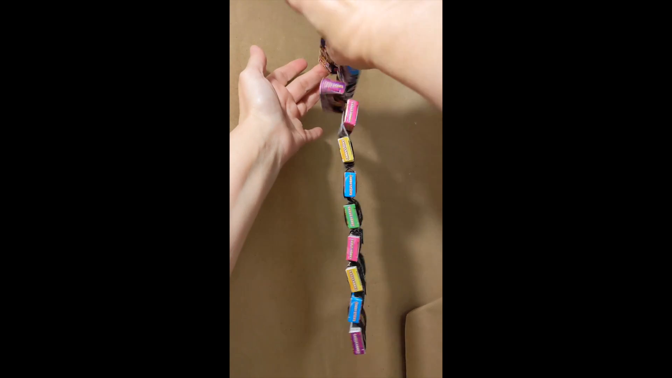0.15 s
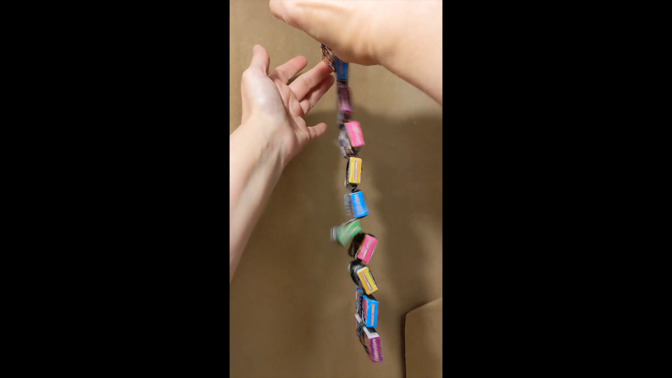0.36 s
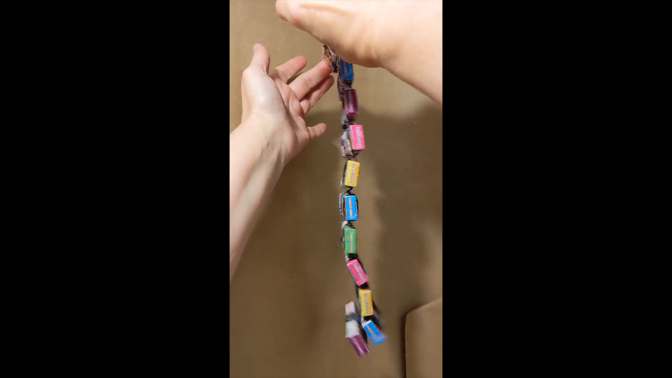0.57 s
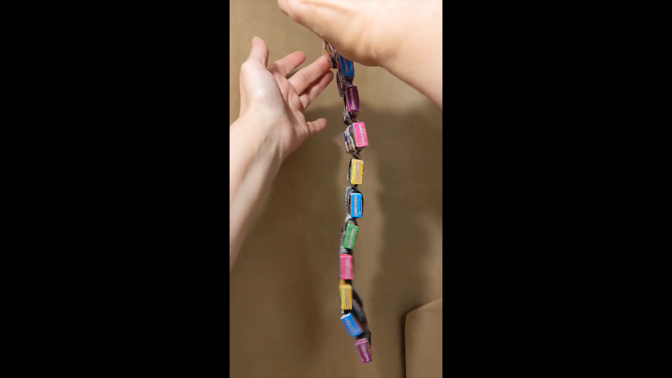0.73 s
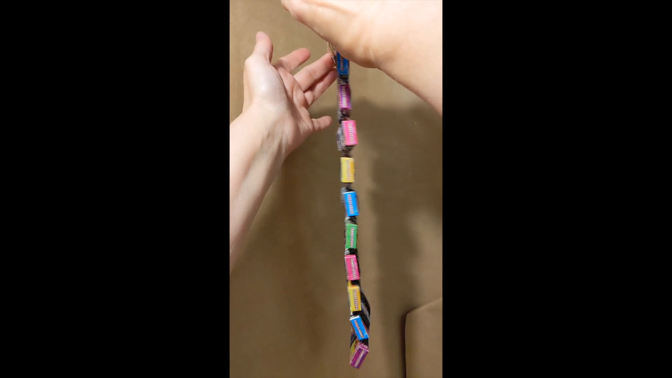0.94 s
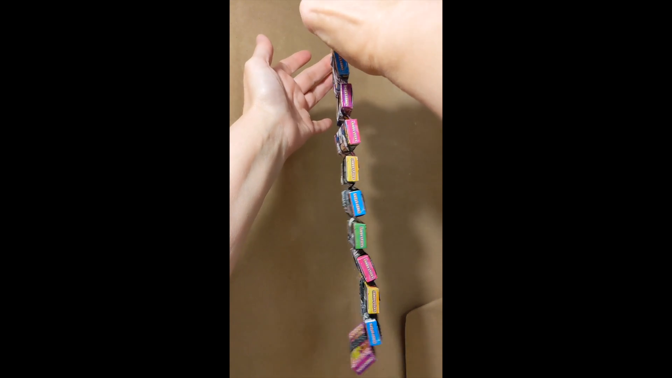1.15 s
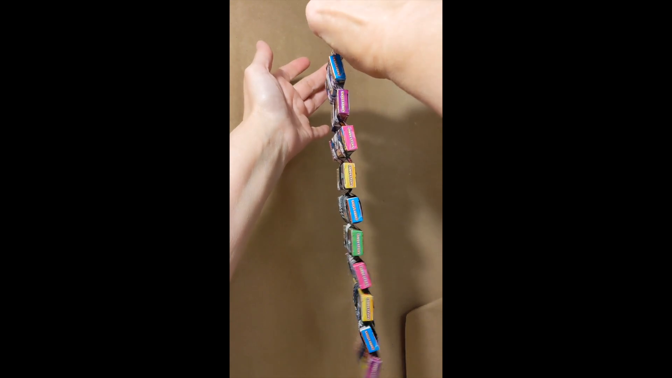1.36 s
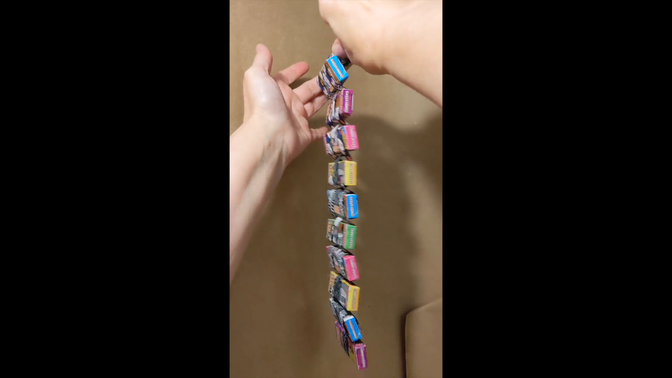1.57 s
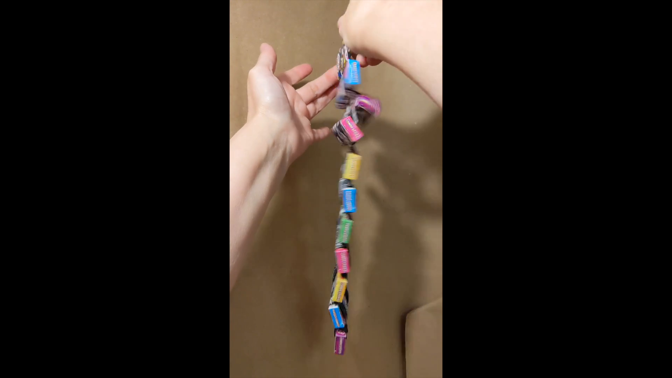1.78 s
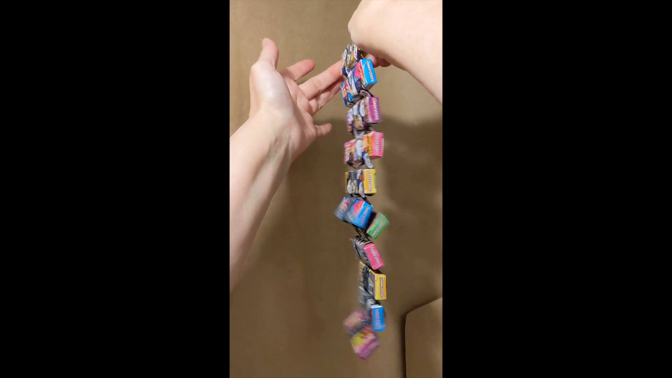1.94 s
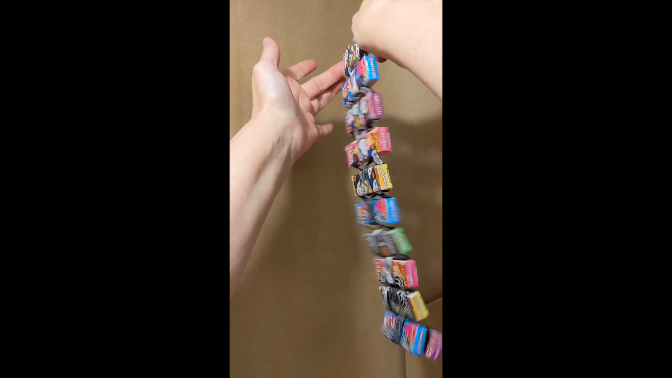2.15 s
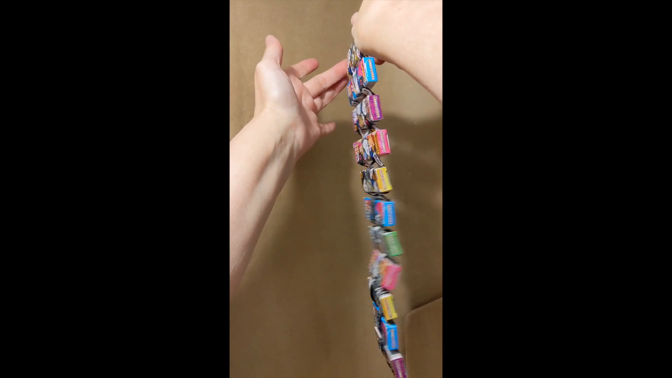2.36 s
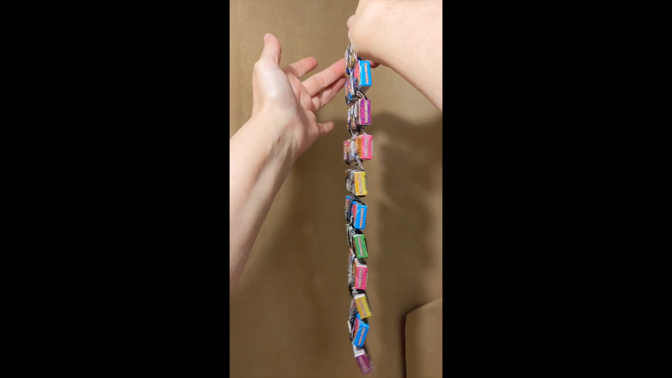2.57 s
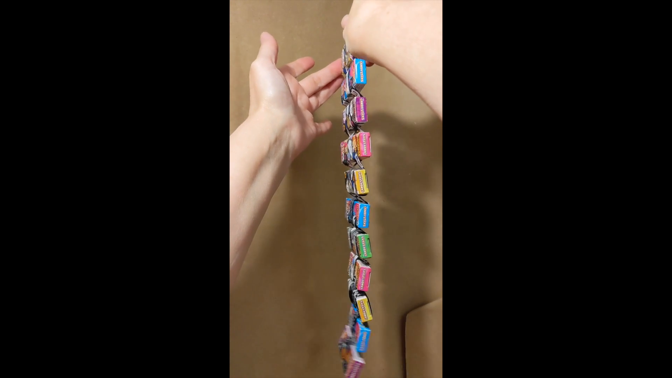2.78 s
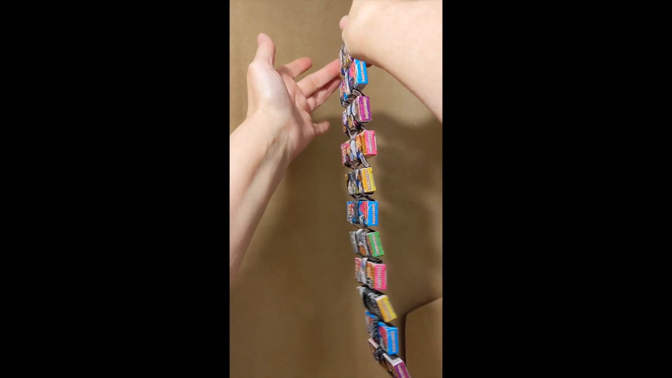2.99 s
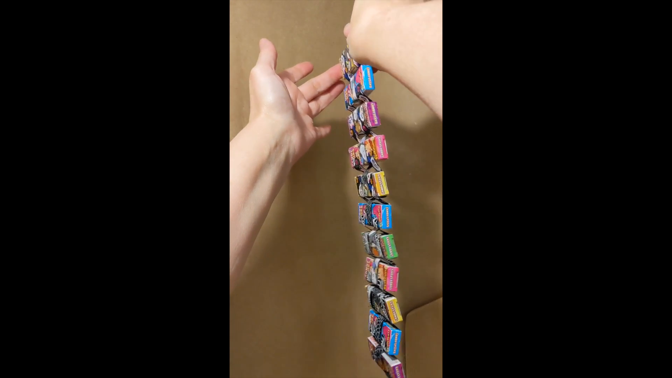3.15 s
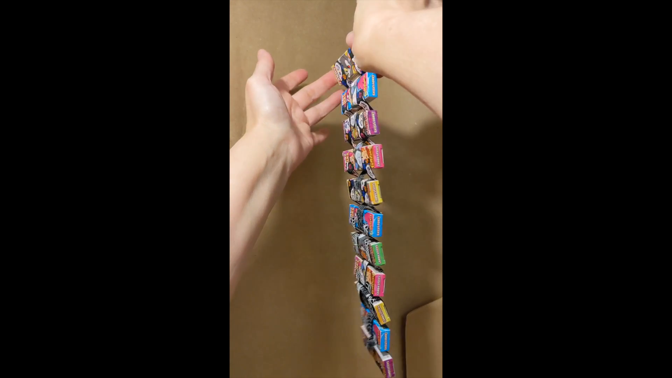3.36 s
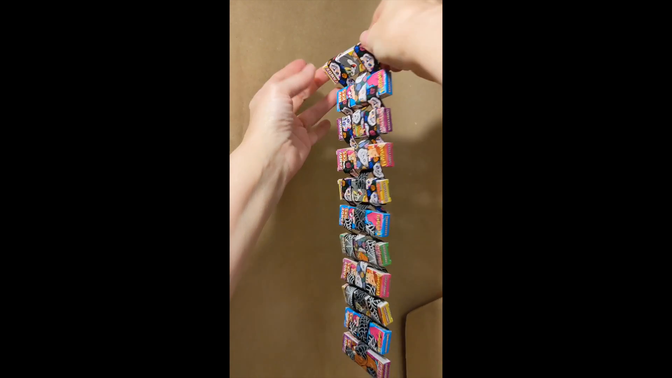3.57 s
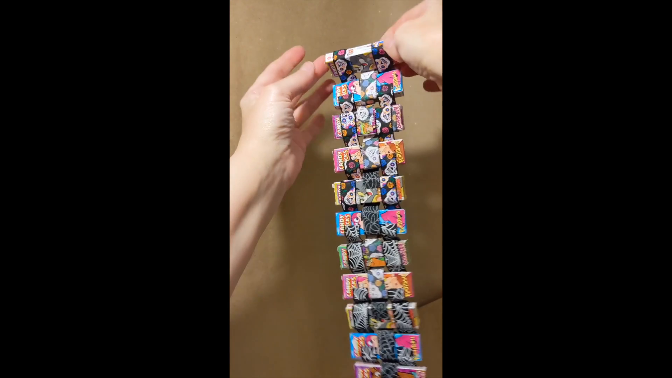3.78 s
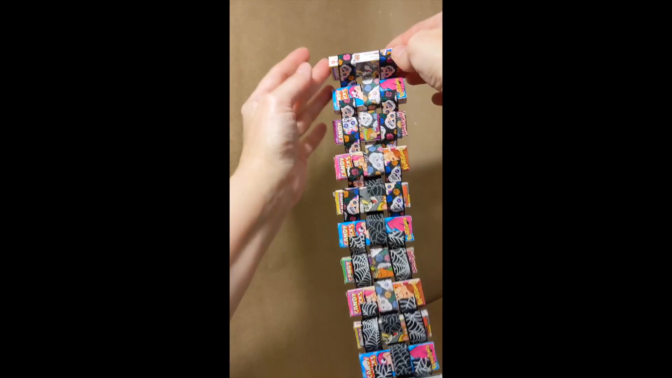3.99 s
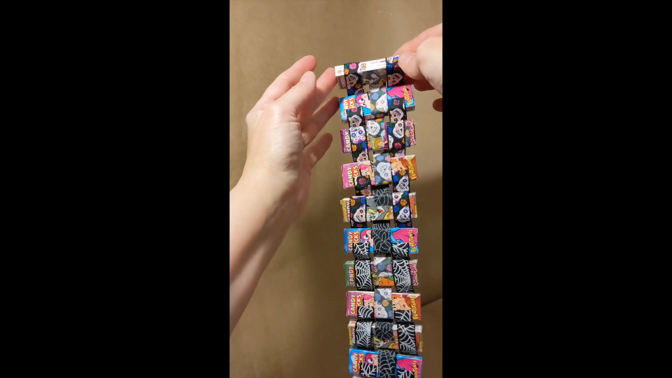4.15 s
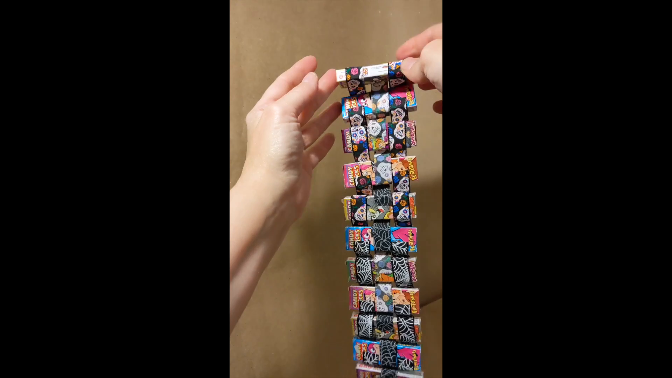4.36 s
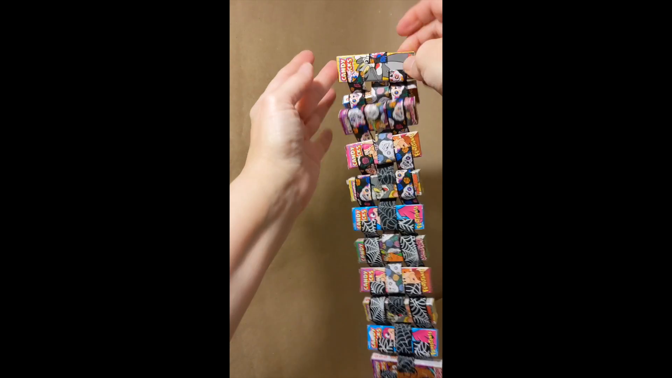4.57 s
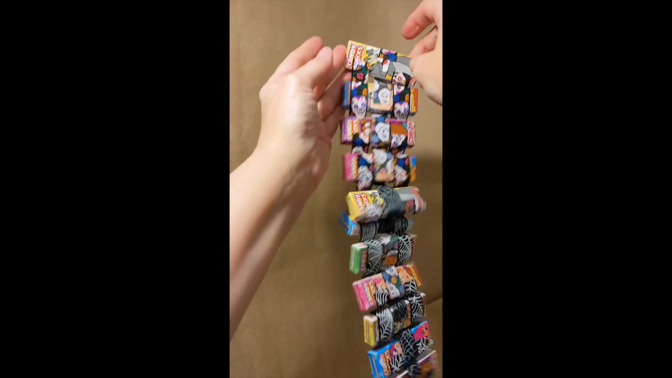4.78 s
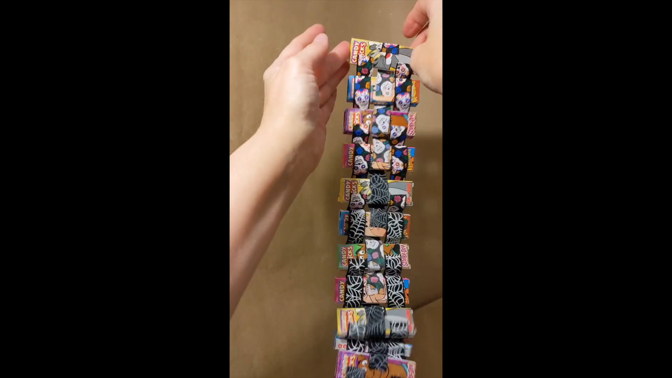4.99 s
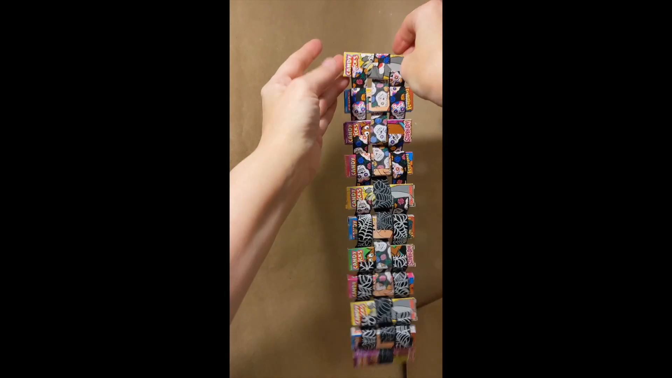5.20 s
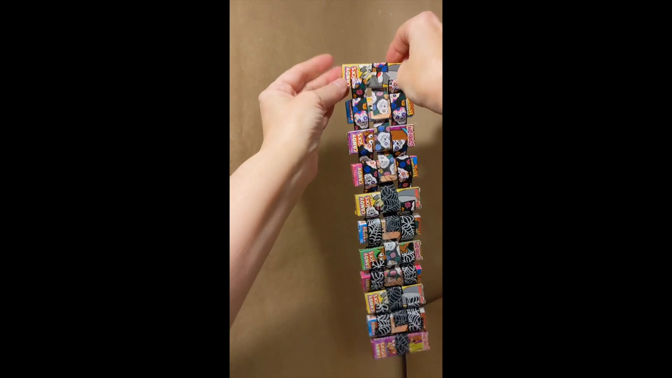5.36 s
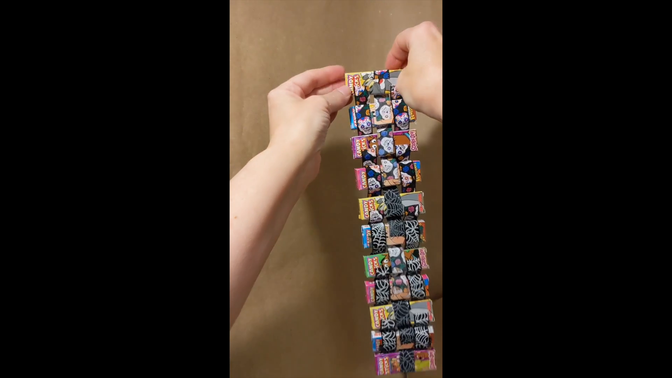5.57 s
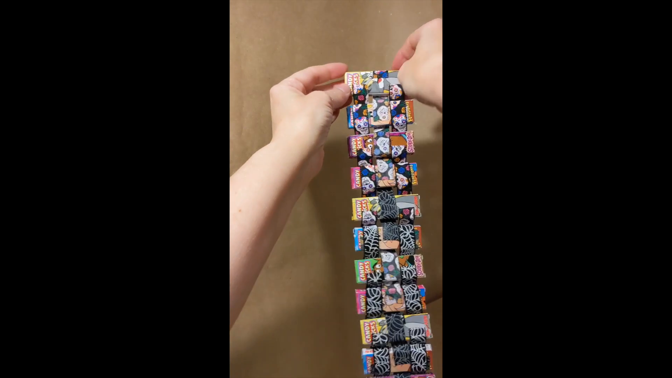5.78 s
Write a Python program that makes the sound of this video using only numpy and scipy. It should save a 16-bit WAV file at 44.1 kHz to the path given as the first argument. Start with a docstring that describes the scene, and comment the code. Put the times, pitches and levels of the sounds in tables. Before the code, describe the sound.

Small cardboard boxes on ribbons tumble down in three clattering, rustling cascades, with sparse ticks between and a few dull knocks in a quiet room.

```python
"""Tumbling chain of cardboard boxes

A chain of small cardboard boxes on ribbons hangs from a hand in a quiet room and tumbles down three times.
Claps and crackle, made of pulses and noise, ring through the resonances of a box; light taps fall between.
Dull knocks are struck modes, a puff of air on the left microphone port is low noise,
and a low hum of wavering tones throbs over the room's hush of noise bands."""
import sys
import numpy as np
from scipy import signal
from scipy.io import wavfile
from scipy.ndimage import uniform_filter1d

SR = 44100
rng = np.random.default_rng(int(sys.argv[2]) if len(sys.argv) > 2 else 0)


def wav_record(signal):
    """Record a signal, one row per channel, as 16-bit PCM in the file named by sys.argv[1]."""
    frames = np.transpose(np.atleast_2d(signal))
    bounded = np.clip(frames, -1, 1)
    # unit amplitude maps onto the largest positive 16-bit level
    quanta = np.round(bounded * 32767).astype(np.int16)
    wavfile.write(sys.argv[1], SR, quanta)


def to_linear_factor(level_db):
    """Convert decibel levels (scalar or array-like) to linear amplitude factors."""
    exponent = np.asarray(level_db, float) / 20
    return 10 ** exponent


N = 257103

# How hard the chain swings, heard as crackle of the box faces.
# Each row: time in seconds, crackle level in dB, bright edge in dB relative to the faces.
SWING = [(0.0, -50.5, -0.5), (.1, -56, 3), (.39, -35, -4.5), (.55, -44, 3), (.8, -49, -12), (1.1, -49, -13),
         (1.39, -61.5, -2), (1.76, -51.5, 2), (1.98, -36.5, -2.5), (2.24, -30, -11), (2.31, -54, -1),
         (2.4, -41, -4), (2.66, -56, -5), (2.9, -57.5, -20), (3.18, -60, -4), (3.68, -55.5, -1),
         (4.17, -50, -3), (4.55, -63.5, 6), (4.63, -37, -2), (5.07, -37.5, -3.5), (5.44, -46, -6.5),
         (5.83, -47, -2)]
BODY_TOP_HZ, FACE_TOP_HZ = 1000, 4000   # the hollow body rings below, faces between, edges above
LEFT_LATE_MS = 0.17   # chain and hush reach the left port this much later than the right


def rms_one(x):
    """Scales a sound to an rms of 1."""
    return x / np.sqrt(np.mean(x ** 2) + 1e-20)


def in_time(rows):
    """Draws straight lines in time between the rows of a table, one curve per column."""
    s, *columns = np.transpose(rows)
    return [np.interp(np.arange(N) / SR, s, c) for c in columns]


def at_hz(points, hz):
    """Reads a table at a pitch, with lines drawn on a logarithmic pitch scale."""
    table_hz, values = np.array(points).T
    return np.interp(np.log(hz), np.log(table_hz), values)


def drift(rate_hz):
    """Slow chance wavering of rms 1: noise twice through a one-pole low-pass, first second dropped."""
    r = np.exp(-2 * np.pi * rate_hz / SR)
    noise = rng.standard_normal(N + SR)
    return rms_one(signal.lfilter([1], [1, -2 * r, r * r], noise)[SR:])


def panned(left_right_db):
    """Left and right gains that differ by the given dB."""
    return to_linear_factor(np.multiply.outer([.5, -.5], left_right_db))


def delayed(x, lag_ms):
    """Shifts a sound later by a few samples; the end wraps to the start."""
    return np.roll(x, round(lag_ms * SR / 1000))


def noise_pair(hz, lag_ms):
    """White noise, as alike as the two ports hear this pitch; the left port hears it later."""
    # Each row: pitch in Hz, likeness of left and right from 0 to 1.
    likeness = [(100, 0.91), (300, 0.89), (650, 0.7), (1300, 0.84), (3000, 0), (8000, 0)]
    mid, side = rng.standard_normal((2, N))
    alike = np.clip(at_hz(likeness, hz), -1, 1)
    shared = np.sqrt(.5 + alike / 2) * mid
    opposed = np.sqrt(.5 - alike / 2) * side
    return np.array([delayed(shared + opposed, lag_ms), shared - opposed])


def resonate(x, hz, width_hz):
    """One resonance with gain 1 at its peak."""
    r = np.exp(-np.pi * width_hz / SR)
    feedback = [1, -2 * r * np.cos(2 * np.pi * hz / SR), r * r]
    return signal.lfilter([(1 - r * r) / 2, 0, (r * r - 1) / 2], feedback, x)


def contacts(per_s, spread_db, ms):
    """Envelope of random touches of uneven size, each a scratch that dies in a moment; rms 1."""
    sizes = to_linear_factor(spread_db * np.minimum(rng.exponential(1, N), 4))
    touches = sizes * (rng.random(N) < per_s / SR)
    return rms_one(signal.lfilter([1], [1, -np.exp(-1000 / (ms * SR))], touches + 1e-9))


def hush():
    """Room and microphone noise, built from half-octave bands."""
    # Each row: pitch in Hz, relative strength in dB per Hz.
    spectrum = [(15, -34), (25, -4), (64, -7.5), (153, -3.5), (277, -13.5), (427, -12), (1020, -23),
                (1650, -28), (1840, -17), (3160, -34), (3720, -42), (6740, -27), (13600, -49.5),
                (16000, -36)]
    hush_db = -59.5   # rms level of all bands together
    edges_hz, out = 25 * 2 ** np.arange(0, 9.6, .5), 0
    for low, high in zip(edges_hz, edges_hz[1:]):
        hz = np.sqrt(low * high)
        band = signal.butter(2, [low, high], "band", fs=SR, output="sos")
        out = out + to_linear_factor(at_hz(spectrum, hz)) * signal.sosfilt(band, noise_pair(hz, LEFT_LATE_MS))
    return to_linear_factor(hush_db) * rms_one(out)


def hum():
    """Low tones that waver a little in level and phase; the lower two beat against each other."""
    # Each row: pitch in Hz, middling rms level in dB.
    tones = [(59.15, -65), (64.6, -67), (148.3, -75.5)]
    in_step_s = 3.495   # a moment when the beat is near its top
    t = np.arange(N) / SR - in_step_s
    out = 0
    for hz, db in tones:
        level = np.sqrt(2) * to_linear_factor(db + 1.14 * drift(0.55))
        out = out + level * np.sin(2 * np.pi * hz * t + 0.1 * drift(0.94))
    return out


def puff():
    """Air on the left port: low turbulence with its swings kept fairly even, faint at the right port."""
    # Each row: time in seconds, level in dB.
    swell = [(5.1, -60), (5.202, -38), (5.222, -24.5), (5.33, -30.5), (5.357, -26), (5.436, -55),
             (5.459, -39), (5.522, -57), (5.568, -37.5), (5.68, -65)]
    right_db = -31   # right port relative to left
    s, db = np.transpose(swell)
    level = to_linear_factor(np.interp(np.arange(N) / SR, s, db, left=-120, right=-120))
    low_band = signal.butter(3, [52, 160], "band", fs=SR, output="sos")
    eddies = signal.sosfilt(low_band, rng.standard_normal(N))
    # divide by the running loudness to even out the swings
    eddies = eddies / np.sqrt(uniform_filter1d(rms_one(eddies) ** 2, size=900) + 0.079)
    eddies = signal.sosfilt(signal.butter(2, 300, fs=SR, output="sos"), eddies)
    return level * rms_one(eddies) * to_linear_factor([[0], [right_db]])


def knocks():
    """Dull knocks and rebounds: each strikes every mode, neighbouring modes in opposite directions."""
    # Each row: time in seconds, level in dB, lowest pitch fully struck in Hz,
    # fall above that pitch in dB per octave, left-right difference in dB.
    strikes = [(3.5275, -38, 417, 13, 6), (3.9773, -30, 247, 6, 3.5), (4.1815, -17.5, 101, 11, 4),
               (4.28, -25, 247, 4, 4), (4.2817, -45, 247, 13, 5), (5.3879, -31, 247, 4.5, 15),
               (5.3933, -27, 333, 6, 5), (5.5582, -25.5, 247, -0.5, 4), (5.5613, -26, 560, -1, 3.5),
               (5.5638, -27, 1188, -1, -2)]
    # What the knocked thing rings with. Each row: pitch in Hz, strength in dB,
    # time to die away by 60 dB in seconds.
    modes = [(101, 0, 0.0092), (247, 2, 0.039), (458, -3.5, 0.045), (687, -4, 0.021), (1188, 5, 0.018),
             (1500, 0, 0.024), (2000, 10, 0.0057), (3200, -11, 0.0059), (4800, -8, 0.011)]
    left_lag_ms = -0.25   # the knocks reach the left port first
    fall_below_db_per_oct = 23
    s, level_db, struck_hz, fall_db, pan_db = np.transpose(strikes)
    at = np.round((s + [[left_lag_ms / 1000], [0]]) * SR).astype(int)
    out = 0
    for k, (hz, mode_db, t60) in enumerate(modes):
        octaves = np.log2(hz / struck_hz)
        db = level_db + np.where(octaves > 0, -fall_db, fall_below_db_per_oct) * octaves
        clicks = np.zeros((2, N))
        clicks[[[0], [1]], at] = (-1) ** k * to_linear_factor(db + mode_db) * panned(pan_db)
        push = resonate(clicks + 1e-18, hz, 0.9 * hz)   # the ring swells over a cycle or so
        r, w = to_linear_factor(-60 / (t60 * SR)), 2 * np.pi * hz / SR
        out = out + signal.lfilter([0, np.sin(w)], [1, -2 * r * np.cos(w), r * r], push)
    soft_fingertip = signal.butter(3, 2400, fs=SR, output="sos")
    return signal.sosfilt(soft_fingertip, out)


def crackle_envelopes():
    """Card and ribbon rub in clumps while the chain moves; body, faces and edges tick on their own."""
    body_db = -4.5   # hollow body relative to faces
    steady_rub = 0.15   # even rubbing under the single ticks, relative to their rms
    face_db, edge_db = in_time(SWING)
    clumps = to_linear_factor(4.2 * drift(12))
    rub = []
    for per_s, ms in [(150, 8.6), (260, 2.8), (350, 9.0)]:   # body, faces, edges
        rub.append(rms_one(steady_rub + contacts(per_s * clumps, spread_db=3.5, ms=ms)))
    return np.array(rub) * to_linear_factor(np.array([face_db + body_db, face_db, face_db + edge_db]))


def taps():
    """Light taps at chance moments, stronger when the chain swings harder; columns like the claps."""
    count = 220
    tap_db, spread_db, middling_swing_db = -51, 3, -54.5   # tap level at a middling swing
    follows = 0.62   # share of the swing's dB that a tap follows
    edge_db, edge_spread_db = -9.5, 4.5   # bright edge relative to the tap
    low_hz, high_hz, middling_ms = 1630, 3300, 4.0
    when, pitch = rng.random((count, 2)).T
    size, edge, length = rng.standard_normal((count, 3)).T
    s = when * (N - 1) / SR
    swing_db = np.interp(s, *np.transpose(SWING)[:2])
    level_db = tap_db + follows * (swing_db - middling_swing_db) + spread_db * np.clip(size, -2, 1.5)
    face_hz = low_hz * (high_hz / low_hz) ** (pitch ** 2)   # low pitches come up more often
    return np.c_[s, level_db, edge_db + edge_spread_db * edge, face_hz, middling_ms * np.exp(.45 * length)]


def clap_force(claps, hz):
    """Force of all claps on one resonance: contacts gather, the faces slap shut, the contacts fade."""
    gather_share = 0.18   # rise time as a share of the fade time
    s, db, edge_db, face_hz, ms = claps.T
    # resonances near the struck face's pitch are favoured: 7 dB, less 19 dB per octave away
    face_db = 7 - np.minimum(19 * np.abs(np.log2(hz / face_hz)), 7.5)
    body_db = -3 + 0.23 * edge_db   # a square hit wakes hollow body and edge together
    part = np.searchsorted([BODY_TOP_HZ, FACE_TOP_HZ], hz)
    level = to_linear_factor(db + [body_db, face_db, edge_db][part])
    lead, at = 1000, np.round(s * SR).astype(int)   # samples of gathering kept before a slap
    t_ms = (np.arange(3600) - lead) * 1000 / SR
    run, slaps = np.zeros(N + 4000), np.zeros(N)
    for i, height, length in zip(at, level, np.maximum(ms, 1)):
        since_slap = np.where(t_ms < 0, -t_ms / gather_share, t_ms)
        run[i:i + len(t_ms)] += height * np.exp(-since_slap / length)
    slaps[at] = 4.36 * level * rng.choice([-1, 1], len(at))
    return run[lead:lead + N], slaps


def boxes():
    """Claps and crackle shake every resonance of the box; each flickers as other boxes take their turn."""
    # The clearest box-on-box claps. Each row: time of the slap in seconds, level in dB,
    # bright edge in dB relative to the slap, pitch of the struck face in Hz,
    # time the contacts take to fade in milliseconds.
    clear_claps = [(.0795, -48, 6, 2690, 12), (.1273, -43, -6, 1620, 27), (.165, -41, 7, 2430, 28),
                   (.2341, -41.5, 5, 1900, 7.2), (.2461, -40.5, 7.5, 1720, 4.2), (.291, -31, 4, 1800, 13),
                   (.3287, -30.5, -6, 2060, 20), (.3712, -32.5, 12, 3300, 6.2), (.4264, -25, 5, 2950, 2.7),
                   (.4915, -36, -10, 1920, 43), (.533, -20, -10, 1760, 5.1), (.5896, -29, 1, 2000, 3.8),
                   (.5965, -24.5, 0.5, 1900, 8.2), (.6793, -27, -9, 2050, 16), (.7021, -22, -23, 1800, 2.1),
                   (.7101, -25.5, -1.5, 1740, 8), (.7517, -36, -7, 2360, 13), (.8221, -60, -16, 2410, 2),
                   (.8763, -46, -11, 2450, 4.3), (.8875, -44.5, -5, 2720, 54), (1.0009, -45.5, 4, 3010, 23),
                   (1.057, -46, 5, 3360, 7.6), (1.0876, -55, 3, 1940, 14), (1.1245, -47, 6, 1740, 2.3),
                   (1.163, -31.5, -38, 2500, 2.3), (1.174, -43, -18, 3010, 2.9),
                   (1.1839, -39.5, -14, 2020, 10), (1.2937, -36.5, -1, 2180, 8.2),
                   (1.4195, -39, -26, 2350, 9.6), (1.4814, -46, -23, 2310, 6.9), (1.66, -47.5, 8, 2000, 17),
                   (1.8011, -32, 1, 1960, 5.2), (1.8088, -28.5, -1.5, 1740, 6.5),
                   (1.842, -30, 2.5, 1620, 20.5), (1.8705, -30.5, 1, 1760, 13),
                   (1.9066, -25.5, 1, 2060, 10), (1.9724, -23, 0.5, 1750, 5), (2.0291, -30, -1, 2270, 30),
                   (2.0478, -36.5, 3, 2000, 13), (2.0747, -32.5, 9, 2170, 5.2),
                   (2.1133, -37.5, 0, 2240, 27), (2.1495, -29, 2.5, 1940, 13),
                   (2.1771, -35, 11.5, 1810, 9.3), (2.205, -30, -6, 2000, 7.8),
                   (2.223, -27, 10.5, 2580, 11.8), (2.2316, -31.5, -7, 1850, 4.6),
                   (2.2857, -29.5, -3, 2020, 15), (2.3517, -35.5, -11, 1870, 10.5),
                   (2.3733, -33, -3, 1760, 9.4), (2.387, -29, -13, 3220, 4), (2.401, -32, -18, 3150, 6.6),
                   (2.4619, -31.5, -4.5, 1940, 5), (2.5428, -38, -3.5, 1950, 6.1),
                   (2.5568, -41, -9, 3250, 4.7), (2.5824, -42.5, -15, 2020, 6.2),
                   (2.6554, -38.5, -11, 1720, 8), (2.6754, -36, -26, 3320, 3.5),
                   (2.7767, -43.5, -15, 2990, 3.2), (2.8327, -42, -27, 1980, 8.4),
                   (2.9266, -41, -13, 1890, 2.7), (3.0221, -45, -2.5, 1900, 3.5),
                   (3.0902, -49, -3, 1930, 9.8), (3.1118, -47, -25, 2130, 7.9),
                   (3.2149, -45.5, -4, 1660, 6.2), (3.329, -43.5, -24, 2360, 5.8),
                   (3.727, -47.5, -6, 2000, 100), (3.7684, -49, -21, 1920, 2.3),
                   (4.037, -39, -11, 1820, 6.3), (4.2808, -23, -3, 3370, 4.2), (4.3562, -38, -35, 2680, 3),
                   (4.5101, -42, -18, 1840, 5.3), (4.5398, -43, -3, 2470, 18), (4.6061, -20, -5, 2660, 6.1),
                   (4.6128, -23, 6, 2350, 11), (4.6868, -27.5, 3, 3200, 15.5),
                   (4.8197, -31.5, -2, 2000, 13), (4.8323, -32.5, 1.5, 2180, 12),
                   (4.856, -21.5, -5, 1850, 8.1), (4.8776, -35, -31, 2890, 15),
                   (4.9083, -20, -9.5, 2300, 7.7), (4.967, -30.5, -17, 1840, 47),
                   (5.0246, -34, -13, 2160, 18), (5.0475, -27.5, -5, 1790, 4.9), (5.055, -25, -6, 1710, 11),
                   (5.0834, -26, -0.5, 1830, 17), (5.121, -30.5, -9.5, 2200, 4.2),
                   (5.1544, -25, -10, 1860, 16), (5.1712, -38.5, -12, 1800, 16),
                   (5.1874, -23.5, -4, 1870, 3.4), (5.197, -18, 3.5, 1900, 3), (5.224, -36, -20, 1590, 19),
                   (5.2632, -33, -18, 1610, 9.2), (5.2943, -33, -3, 2000, 3.2),
                   (5.3713, -31.5, -37, 2870, 6.1), (5.4075, -34.5, -23, 1790, 7.9),
                   (5.4753, -41, -13, 2060, 5.4), (5.6184, -35, -32, 3200, 4.9),
                   (5.6808, -33.5, -20, 1640, 4.3), (5.695, -40.5, -8, 3170, 4.5)]
    # What a box rings with. Each row: pitch in Hz, width in Hz, middling strength in dB.
    resonances = [(369, 284, -4.5), (525, 550, 0), (695, 290, -6.5), (1164, 215, -7.5), (1396, 160, -12.5),
                  (1858, 217, -1.5), (2050, 270, -5.5), (2423, 324, -2.5), (2930, 350, -4.5),
                  (3250, 210, -9), (4880, 860, -3), (6250, 1120, -3.5), (8000, 2000, -11), (8500, 810, -12),
                  (13600, 1000, -36)]
    sides = panned(-1)[:, None]   # the chain hangs a little to the right
    # fine grit in the claps of body, faces and edges, over a steady share
    grit = [rms_one(steady + contacts(900, spread_db=1.0, ms=0.37)) for steady in (.8, .35, .9)]
    crackle = crackle_envelopes()
    claps = np.r_[clear_claps, taps()]
    out = 0
    for hz, width_hz, db in resonances:
        part = np.searchsorted([BODY_TOP_HZ, FACE_TOP_HZ], hz)
        run, slaps = clap_force(claps, hz)
        rubbing = np.hypot(run * grit[part], crackle[part]) * sides * noise_pair(hz, LEFT_LATE_MS)
        slaps = np.array([delayed(slaps, LEFT_LATE_MS), slaps]) * sides
        turn = to_linear_factor(db + 2.05 * drift(26))
        # wide resonances pass more noise, so they are turned down
        out = out + resonate(turn * (rubbing + slaps), hz, width_hz) * np.sqrt(1000 / width_hz)
    too_small_for_bass = signal.butter(2, 300, "high", fs=SR, output="sos")
    return signal.sosfilt(too_small_for_bass, out)


def room(x):
    """Short all-pass scatterers, then six feedback delays a side that grow duller on every round."""
    t60_s, wall_cut_hz = 0.11, 4200   # setting of the loop decay, and of the walls' treble loss
    out, dull = np.zeros((2, N)), np.exp(-2 * np.pi * wall_cut_hz / SR)
    for lag in (37, 83, 151):   # samples
        scatter = np.r_[1, np.zeros(lag - 1), -.65]
        x = signal.lfilter(scatter[::-1], scatter, x)
    lags = (rng.uniform(.007, .03, 12) * SR).astype(int)
    for k, lag in enumerate(lags):
        side = k % 2
        loop, gain, state = x[side].copy(), to_linear_factor(-60 * lag / SR / t60_s), [0.]
        for i in range(lag, N, lag):   # one block per trip round the loop
            back, state = signal.lfilter([gain * (1 - dull)], [1, -dull], loop[i - lag:i], zi=state)
            loop[i:i + lag] += back[:N - i]
        out[side] += (loop - x[side]) * (-1) ** (k // 2)
    return out


def scene():
    """Chain and knocks in the room, with the air puff, hum and hush."""
    chain, thuds = boxes(), knocks()
    through_air = to_linear_factor(-9)   # the knocks reach the ports mostly through the case
    echoes = to_linear_factor(-11.5) * room(chain + through_air * thuds)
    return chain + thuds + echoes + puff() + hum() + hush()


def band_limit(x):
    """A steep low-pass at the top of the band."""
    return signal.sosfilt(signal.butter(12, 16450, fs=SR, output="sos"), x)


def record(dry):
    """The microphones lose the deepest bass, and the top of the treble is cut."""
    bass_cut = signal.butter(4, 44, "high", fs=SR, output="sos")
    top_cut = signal.cheby2(12, 60, 16300, fs=SR, output="sos")
    mix = signal.sosfilt(np.vstack([bass_cut, top_cut]), dry)
    return band_limit(mix)


dry = scene()
out = record(dry)
wav_record(out)
```